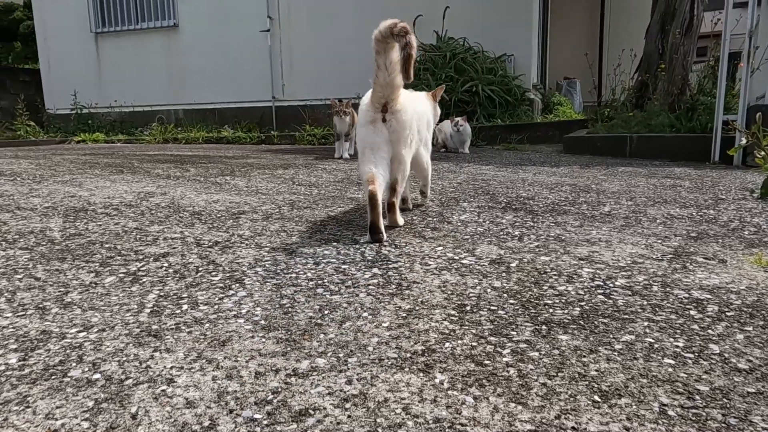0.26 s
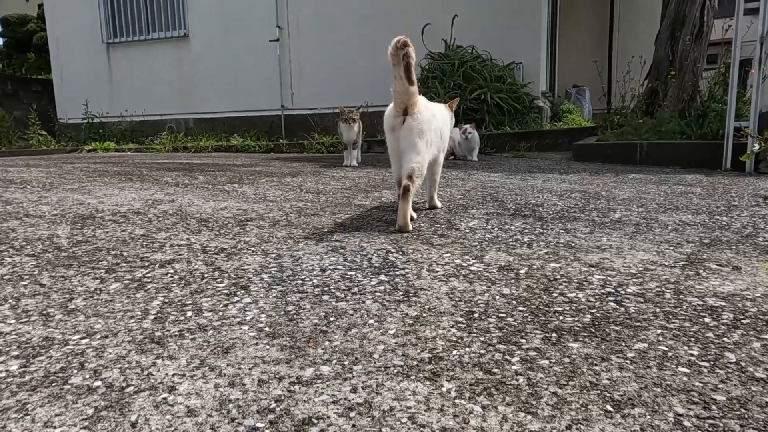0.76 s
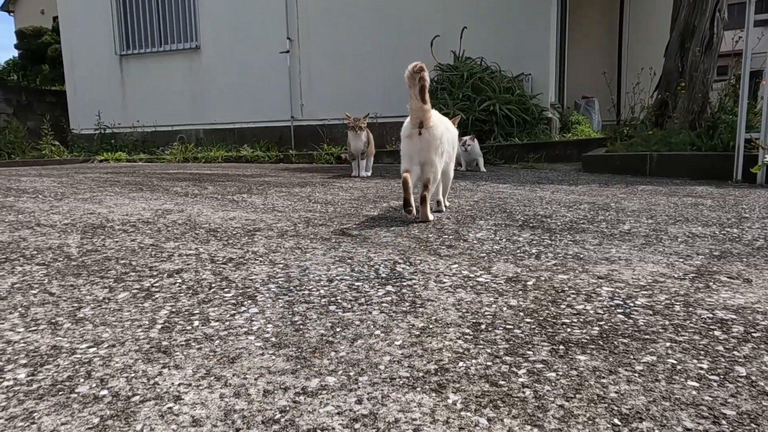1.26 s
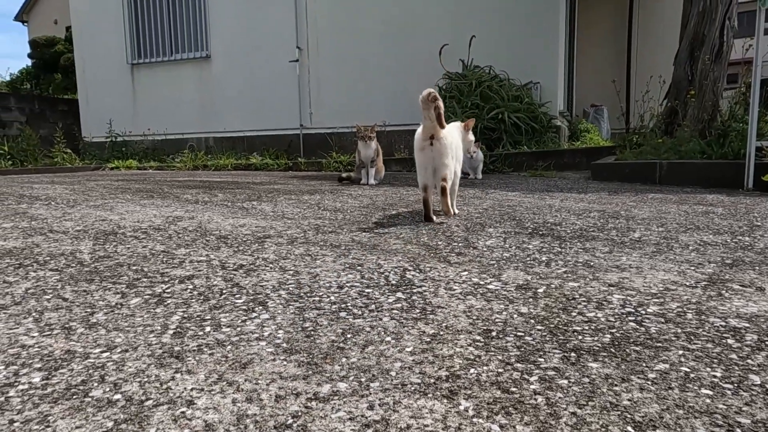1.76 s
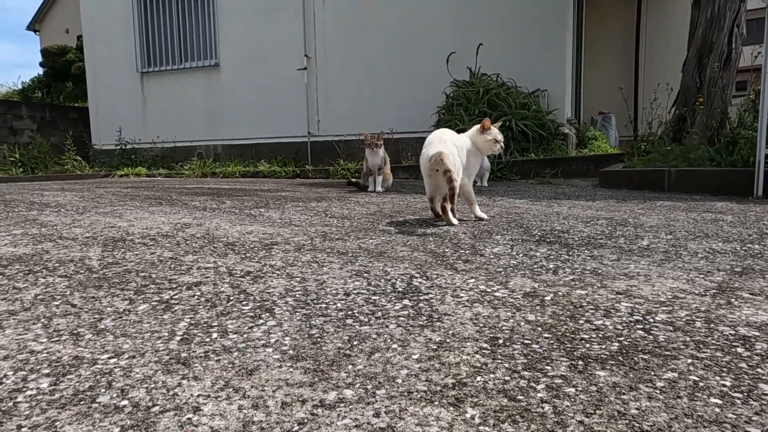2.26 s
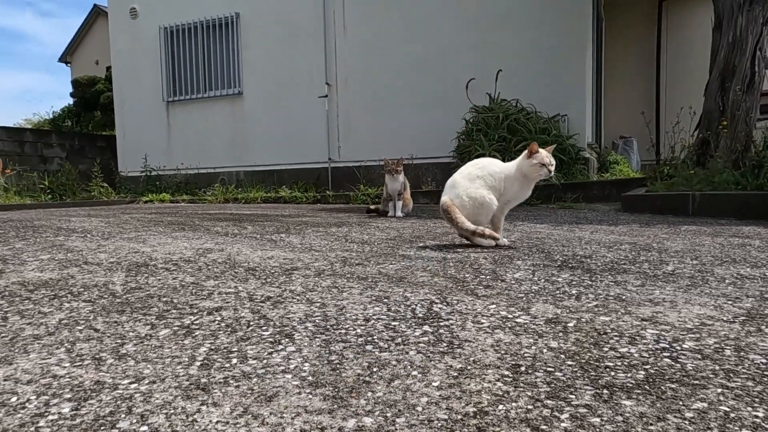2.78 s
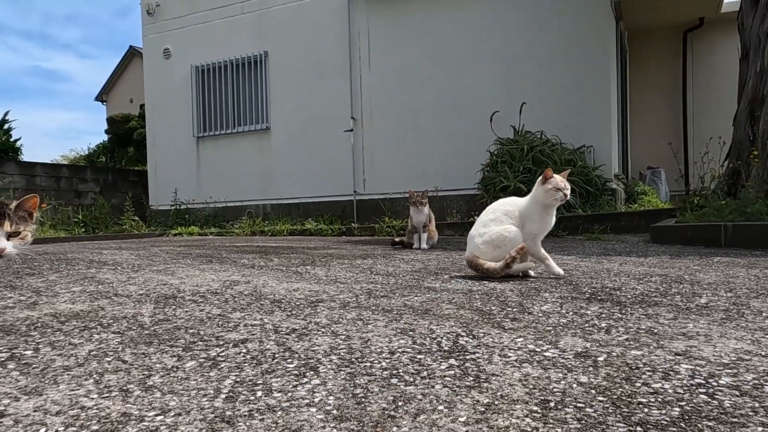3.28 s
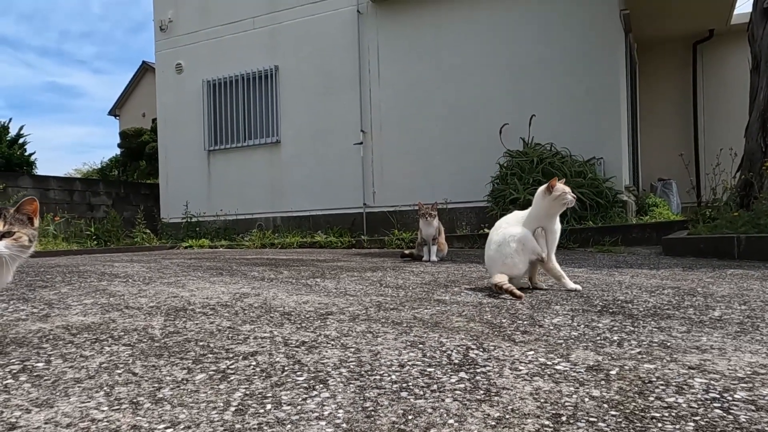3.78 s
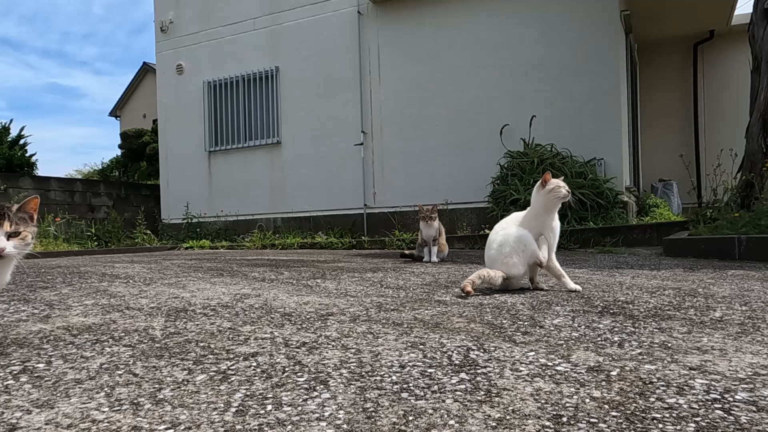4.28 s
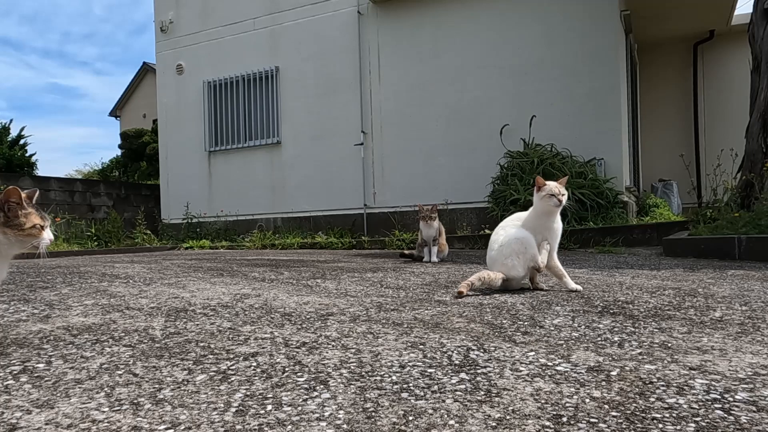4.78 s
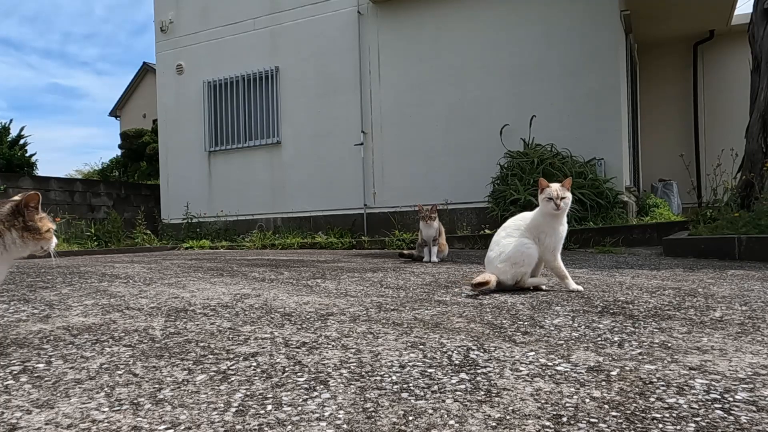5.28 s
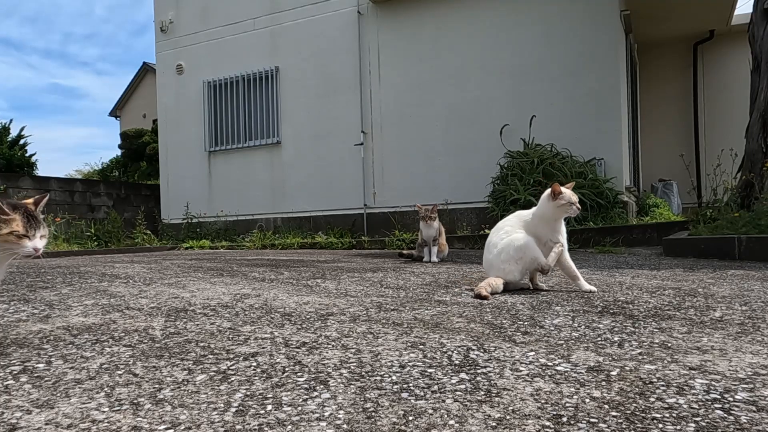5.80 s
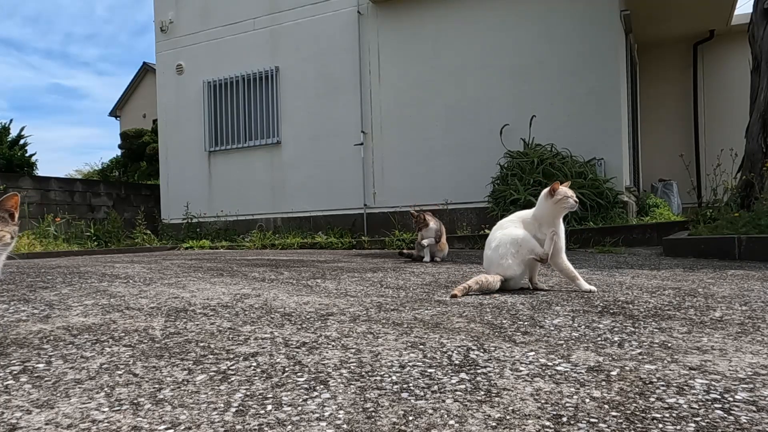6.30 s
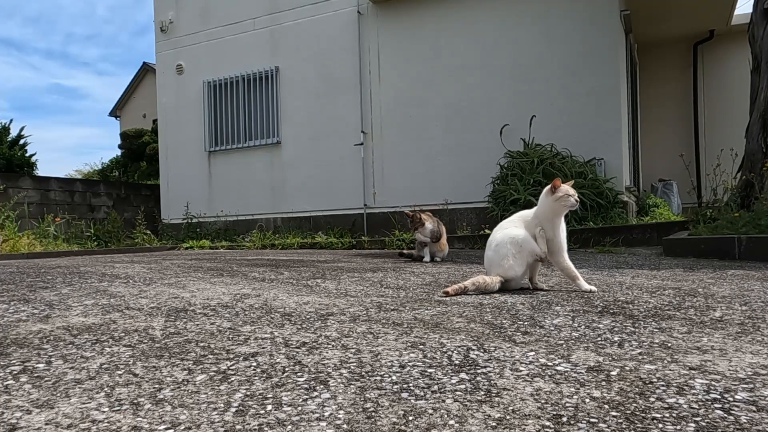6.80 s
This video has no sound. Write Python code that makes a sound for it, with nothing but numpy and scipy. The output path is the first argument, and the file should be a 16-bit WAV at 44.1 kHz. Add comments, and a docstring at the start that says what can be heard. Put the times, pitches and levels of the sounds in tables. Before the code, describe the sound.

A faint, steady yard hush lies under soft, close rustling of a cat's fur and feet, which comes and goes throughout. From about 0.6 to 2.6 seconds, paws bump lightly and grit ticks on concrete, ending in a sharper click with a low microphone jolt. At 3.4 seconds a thin metal dish on the left is nudged and clatters, the loudest moment, knocking, skidding and rocking with short, bright rings. Another rattle comes near 4 seconds with a faint swish of the sliding rim, followed by a few lighter taps until 5 seconds. From 5.3 to 6.4 seconds the dish knocks and scrapes again in quick, uneven clusters, with a brief high squeak near 5.9. It settles, leaving a soft paw step around 6.8 seconds and a last rustle. Nearby walls add a slight, short echo.

```python
"""Fur and feet rustle and scuff close by, over the faint hush of a yard. Grit ticks, paws bump
softly and a few jolts of the microphone give low pushes. Then a thin metal dish on the left is
nudged again and again: it knocks, skids and rocks on the rough ground, each touch making the
metal ring, and its sliding rim swishes and squeaks. The walls add a short echo."""
import sys
import numpy as np
from scipy import signal
from scipy.io import wavfile
from scipy.ndimage import uniform_filter1d

SR = 44100
rng = np.random.default_rng(int(sys.argv[2]) if len(sys.argv) > 2 else 0)


def dump_mix(stems):
    """Bounce the given channels to the path in sys.argv[1] as a 16-bit WAV at rate SR."""
    frames = np.atleast_2d(stems).T  # one column per channel
    limited = np.clip(frames, -1, 1)  # hard clip at full scale
    pcm = np.round(limited * 32767).astype(np.int16)
    wavfile.write(sys.argv[1], SR, pcm)


N = 310816


def gain_of(db):
    """Turns decibels into a number to multiply by."""
    return 10 ** (np.asarray(db) / 20)


def unit_level(x):
    """Scales a signal to an average power of 1."""
    return x / np.sqrt(np.mean(abs(x) ** 2) + 1e-20)


def look_up(points, hz):
    """Reads between the rows of a table, on a log frequency scale."""
    f, value = np.transpose(points)
    return np.interp(np.log(hz + 1), np.log(f + 1), value)


def sides(pan_db):
    """Left and right gains; a pan above zero is louder on the left."""
    return gain_of([pan_db / 2, -pan_db / 2])


def swell_db(t, start, hold, rise_db_per_s, fall_db_per_s):
    """A level that climbs to 0 dB at the start time, holds, then falls."""
    return -rise_db_per_s * np.maximum(start - t, 0) - fall_db_per_s * np.maximum(t - start - hold, 0)


def noise(colour, likeness, patchy_db, flicker_db, size):
    """Stereo noise with a given tone colour, uneven patches and a flickering level."""
    hop = size // 4
    frames, hz = N // hop + 5, np.fft.rfftfreq(size, 1 / SR)
    a, b, c, d, patches = rng.standard_normal((frames, len(hz), 5)).T
    patches = uniform_filter1d(patches, size=size // 64, axis=0)
    patches = unit_level(uniform_filter1d(patches, size=12, axis=1))
    flicker = unit_level(uniform_filter1d(rng.standard_normal(frames), size=3))
    alike = np.clip(look_up(likeness, hz), -1, 1)[:, None]
    left = a + 1j * b
    spectra = np.array([left, alike * left + np.sqrt(1 - alike ** 2) * (c + 1j * d)])
    spectra *= gain_of(colour(hz)[..., None] + patchy_db * patches + flicker_db * flicker)
    return unit_level(signal.istft(spectra, nperseg=size, noverlap=size - hop)[1][:, :N])


def ring(drive, hz, t60, rise=0.00016):
    """Each push starts a tone that swells, then fades by 60 dB in t60 seconds."""
    turn = np.exp(2j * np.pi * np.cumsum(hz * np.ones(drive.shape[-1])) / SR)
    swell, decay = np.exp(-1 / (rise * SR)), np.exp(-np.log(1000) / t60 / SR)
    return (turn * signal.lfilter([1 - swell], np.poly([swell, decay]), drive * turn.conj())).imag


def thin(x, low_hz, high_hz):
    """Small things give off little bass, and their blows little of the highest treble."""
    no_bass = signal.sosfilt(signal.butter(3, low_hz, "high", fs=SR, output="sos"), x)
    return signal.sosfilt(signal.butter(2, high_hz, fs=SR, output="sos"), no_bass)


# tone colours of the rustle's body and hiss: f/Hz, relative level/dB
BODY_COLOUR = [(35, -62), (60, -46), (336, -9), (373, -11.5), (407, -10.5), (610, -7.5), (930, -3.5),
               (1130, 0.5), (4000, -21.5), (5200, -22), (8800, -120)]
HISS_COLOUR = [(1180, -35), (2000, -1), (2380, -8.5), (3660, -8), (4090, -11), (4820, -8), (7610, -12.5),
               (13100, -25.5), (15700, -38)]
# how alike left and right are for close noises: f/Hz, likeness (1 = the same)
CLOSE_LIKENESS = [(60, 0.6), (240, 1), (950, 0.79), (3770, .6), (15000, 0.3)]
# fur strokes and foot scuffs: peak t/s, rise/s, hold/s, body/dB, hiss/dB, pan/dB
STROKES = [(0, .03, 0.11, -58.5, -63.5, 0), (0.499, 0.25, 0.058, -56.5, -62, -1),
           (0.893, 0.033, 0.016, -51, -60, 0.5), (1.091, 0.044, 0.097, -47, -52, 2),
           (1.266, .03, 0.037, -59, -58, 7), (1.432, 0.12, 0.051, -50.5, -52.5, 1),
           (1.619, 0.055, 0.01, -42.5, -48, 7), (1.762, 0.14, 0.037, -51, -57.5, -4),
           (1.897, 0.18, 0.066, -54, -56.5, 1.5), (2.056, 0.035, 0.033, -50.5, -63, 1.5),
           (2.128, 0.19, 0.08, -52.5, -58.5, 1), (2.342, 0.016, 0.013, -60.5, -89, -4),
           (2.492, 0.0069, 0.01, -50.5, -56, 3.5), (2.572, .03, 0.012, -57.5, -68, 0),
           (2.873, .2, 0.033, -68, -64.5, 15), (3.098, 0.092, 0.015, -52, -69, 2),
           (3.354, 0.25, 0.4, -57.5, -60.5, 1.5), (4.342, 0.24, .08, -56, -62, 6.5),
           (4.478, .05, 0.037, -56, -60.5, 3.5), (4.67, 0.077, 0.084, -60, -77, 4.5),
           (4.913, 0.23, 0.015, -55, -57.5, 7.5), (5.272, 0.018, 0.94, -55, -63, 1),
           (6.757, 0.088, 0.05, -58.5, -65, 4), (6.918, 0.066, 0.072, -52, -57, 6)]

def rustle():
    """Fur and feet rub: a lumpy body and a finer hiss swell with each stroke."""
    t = np.arange(0, N + 64, 64) / SR
    start, rise, hold, body_db, hiss_db, pan_db = np.transpose(STROKES)[..., None]
    shape_db = swell_db(t, start, hold, 20 / rise, 20 / (0.11 + hold))  # long strokes fade slowly
    body_power, hiss_power = gain_of(shape_db + body_db) ** 2, gain_of(shape_db + hiss_db) ** 2
    stir_body, stir_hiss = gain_of([-65.5, -72]) ** 2  # faint stirring between strokes
    body_total, hiss_total = body_power.sum(0) + stir_body, hiss_power.sum(0) + stir_hiss
    pan_db = ((pan_db * body_power).sum(0) + stir_body) / body_total
    curves = np.sqrt(body_total), np.sqrt(hiss_total), pan_db
    body_gain, hiss_gain, pan_db = (np.interp(np.arange(N) / SR, t, c) for c in curves)
    body = noise(lambda hz: look_up(BODY_COLOUR, hz), CLOSE_LIKENESS, 2.5, flicker_db=1.5, size=512)
    hiss = noise(lambda hz: look_up(HISS_COLOUR, hz), CLOSE_LIKENESS, 1.0, flicker_db=1.5, size=256)
    return sides(pan_db) * (body_gain * body + hiss_gain * hiss)


# tone colour of the hush: f/Hz, relative level/dB
HUSH_COLOUR = [(12, -55), (20, -24), (113, -11), (141, -20.5), (191, -1), (226, -8), (275, -10.5),
               (568, -5), (730, -11.5), (1240, 1.5), (2110, -13), (3790, -15), (15700, -33.5)]
# how alike its two sides are: f/Hz, likeness
HUSH_LIKENESS = [(60, 0.9), (240, 0.99), (950, 0.84), (3770, 0.067), (15000, 0.063)]
# which way it leans: f/Hz, pan/dB
HUSH_PAN = [(60, 2), (240, -3), (950, 3), (3770, -3.5), (15000, 17.5)]

def hush():
    """The steady, faraway noise of the yard."""
    colour = lambda hz: look_up(HUSH_COLOUR, hz) + np.outer([.5, -.5], look_up(HUSH_PAN, hz))
    return gain_of(-62.5) * noise(colour, HUSH_LIKENESS, patchy_db=4.5, flicker_db=3.0, size=1024)


# grit ticks: t/s, mid level/dB, mid f/Hz, high level/dB, high f/Hz, relative snap/dB, mid t60/s, pan/dB
TICKS = [(0.589, -43, 915, -62, 2960, -63.5, 0.06, -11), (0.605, -32, 980, -52, 2960, -71, 0.059, -6.5),
         (0.897, -43, 980, -71, 3400, -58, .03, 3), (1.19, -34, 1018, -37.5, 3310, -65, 0.055, -8.5),
         (1.201, -41, 1020, -40, 3170, -61, 0.045, 10), (1.282, -45, 987, -36.5, 2900, -48.5, 0.12, -5),
         (1.3, -45.5, 983, -42.5, 2740, -60, 0.077, -17), (1.59, -36.5, 940, -29.5, 2930, -39, 0.042, -5.5),
         (1.606, -35, 1060, -36, 2300, -61, 0.027, 15), (1.623, -34, 990, -27, 3130, -42, 0.045, -1),
         (1.745, -44.5, 696, -67, 2820, -71, 0.065, 3), (1.783, -43, 840, -56, 3700, -53, 0.028, 13),
         (1.798, -31, 1030, -37, 3740, -59, 0.031, -5), (1.879, -28.5, 1138, -25.5, 3850, -67, 0.036, -6.5),
         (2.056, -44, 940, -63, 2770, -73, .028, 5), (2.465, -41.5, 1080, -44, 4000, -103, 0.033, -7),
         (2.488, -42.5, 916, -53, 4870, -56, 0.06, 4), (2.52, -52, 930, -43.5, 7500, -60, 0.036, 15),
         (2.533, -68, 1360, -43, 7400, -69, .027, 16), (2.581, -54, 1000, -43, 7400, -51, .02, 8),
         (2.59, -27, 940, -41, 3500, -33, 0.0071, -9.5), (2.595, -53, 1000, -44, 7400, -50, .025, 12),
         (3.082, -51, 1500, -52.5, 2540, -89, .12, 15), (3.801, -42, 1290, -40, 4240, -56, 0.043, 4),
         (4.283, -54, 1280, -52.5, 2830, -66, 0.037, 18), (6.764, -51, 790, -61, 5540, -78, 0.06, 10)]

def grit():
    """Grit ticks with a dry snap and two short rings; the high one dies sooner."""
    out, t = np.zeros((2, N)), np.arange(4000) / SR
    for s, mid_db, mid_hz, high_db, high_hz, snap_db, t60, pan_db in TICKS:
        rough = rng.standard_normal((4, len(t)))
        fade = gain_of(-60 * t / t60)
        mid = np.sin(2 * np.pi * mid_hz * t) + .5 * unit_level(ring(rough[0], mid_hz, 0.023))
        high = np.sin(2 * np.pi * high_hz * t)
        high += 0.48 * unit_level(ring(rough[1], 1.31 * high_hz, 0.0012, rise=.00003))
        snap = gain_of(snap_db + 10 - 60 * t / min(.007, 0.73 * t60)) * (rough[2:] + 0.49 * rough[2])
        rings = gain_of(mid_db) * fade * mid + gain_of(high_db) * fade ** 2.8 * high
        part = out[:, round(s * SR):][:, :len(t)]
        part += sides(pan_db)[:, None] * thin(rings + snap, low_hz=385, high_hz=9000)
    return out


# microphone jolts: t/s, relative level/dB, time scale/s, pan/dB
JOLTS = [(0.6, -48, 0.0017, -13), (2.466, -49, 0.00084, -14), (2.589, -33, 0.00055, -6),
         (3.4, -51, 0.0014, 4), (3.51, -64, .002, -2), (5.5, -56, 0.0018, 5)]

def jolts():
    """A jolt swings the microphone out and back once, making one low push."""
    out = np.zeros((2, N))
    for s, db, scale_s, pan_db in JOLTS:
        age = np.arange(0, 12, 1 / SR / scale_s)
        part = out[:, round(s * SR):][:, :len(age)]
        part += sides(pan_db)[:, None] * gain_of(db) * age * (2 - age) * np.exp(-age)
    return out


# paw steps: t/s, level/dB, f/Hz
PAW_BUMPS = [(0.604, -53, 179), (0.897, -46.5, 343), (1.2, -49, 414), (1.283, -47.5, 330),
             (1.3, -48.5, 327), (1.591, -65, 324), (1.623, -53, 320), (1.783, -47, 403),
             (2.056, -47.5, 426), (2.466, -59, 401), (2.487, -49, 334), (6.764, -47, 448)]

def paws(rise_s=0.0013, t60=0.084):
    """A soft paw meets the ground with a low tone that soon dies."""
    out, t = np.zeros((2, N)), np.arange(4000) / SR
    for s, db, hz in PAW_BUMPS:
        loudness = gain_of(db - 60 * t / t60) * (1 - np.exp(-t / rise_s))
        out[:, round(s * SR):][:, :len(t)] += loudness * np.sin(2 * np.pi * hz * t)
    return out


# nudges of the dish: t/s, relative skid/dB, relative rocking/dB, hardness/(dB per octave), boosted f/Hz
NUDGES = [(3.379, -34, -73, -6, 1220), (3.397, -25, -28.5, 1.5, 2560), (3.51, -26, -26, 3.5, 2150),
          (3.96, -35, -37, 4, 2330), (5.285, -49, -35, -0.5, 2530), (5.507, -41, -27.5, 0.5, 3660),
          (5.625, -46, -32.5, 0, 2150), (5.7, -38, -29.5, -4.5, 2180), (5.76, -40, -33.5, -9.5, 3550),
          (5.879, -24.5, -31.5, -7, 2650), (6.097, -46, -37, -3, 670), (6.241, -50, -39.5, 4, 2150),
          (6.266, -28, -37, 0, 2090), (6.29, -29.5, -40, -1.5, 2940)]
DISH_SPAN_S = 3.3, 6.8

def chatter(touches_per_s=900):
    """Lists the many tiny touches as the nudged dish skids briefly, then rocks until it settles."""
    start, end = (round(s * SR) for s in DISH_SPAN_S)
    at = start + np.flatnonzero(rng.random(end - start) < touches_per_s / SR)
    t = at / SR
    s, skid_db, rocking_db, hardness_db, hz = np.transpose(NUDGES)[..., None]
    power = gain_of(skid_db + swell_db(t, s, 0, 3000, fall_db_per_s=284)) ** 2
    power += gain_of(rocking_db + swell_db(t, s, 0, 3000, fall_db_per_s=101.5)) ** 2
    lead = power.argmax(0)  # the strongest nudge sets the tone
    since = np.maximum(t - s[lead, 0], 0)
    hardness_db = hardness_db[lead, 0] + 3 * (1 - np.exp(-since / 0.02))  # lighter touches sound harder
    uneven_db = 2.52 * np.minimum(rng.exponential(1, len(at)), 3.5)
    size_db = 10 * np.log10(power.sum(0) + 1e-30) + uneven_db - 20.5
    thud_db, scratch_db, boost_db = np.outer([-1.5, 4, 10.5], np.ones(len(at)))
    return at, size_db, hardness_db, thud_db, scratch_db, hz[lead, 0], boost_db


# dish knocks: t/s, relative blow/dB, hardness/(dB per octave), extra ring/dB, boosted f/Hz
KNOCKS = [(3.399, -13, -3, -5, 1134), (3.405, -8.5, 3, -3.5, 1190), (3.412, -2.5, -1, -13, 2580),
          (3.426, -7, 2, -5.5, 4340), (3.448, -14.5, -7, 3, 3520), (3.51, -10.5, -6.5, -0.5, 2140),
          (3.53, -6.5, -2.5, 1.5, 2150), (3.544, -10.5, 8.5, -9, 2060), (3.56, -7, 8, -11, 2536),
          (3.574, -7.5, 1.5, 0, 1550), (3.613, -14, 6.5, -6, 2560), (3.634, -23.5, 5.5, 3, 2260),
          (3.664, -32.5, 7.5, 4.5, 2600), (3.893, -23, -2.5, -5, 1264), (3.946, -34, -1.5, 11, 4950),
          (3.961, -11, 2, -10.5, 2090), (3.974, -20.5, 8.5, -13, 2090), (3.998, -10, 2.5, -10, 2340),
          (4.035, -28.5, 1, 2.5, 2230), (4.116, -23, -3.5, -2.5, 5140), (4.417, -23.5, -4, -7, 1243),
          (4.434, -20.5, 2, -6, 2330), (4.537, -28, 1, -11, 2000), (4.614, -37.5, -9, 3.5, 3540),
          (4.646, -26, -7.5, -10, 1241), (4.892, -20.5, 0, -13, 1920), (4.922, -24, -3, -6.5, 976),
          (5.21, -35.5, -10, -4, 1245), (5.277, -22, -14.5, -3, 1880), (5.285, -14, 1, -3, 1900),
          (5.291, -15.5, 5, -9.5, 2603), (5.304, -9.5, -4.5, -10.5, 958), (5.329, -16, -3, -4, 2564),
          (5.427, -33, -4, -4, 2620), (5.5, -7, -1, -0.5, 1910), (5.504, -14, 8.5, -9, 3526),
          (5.511, -16.5, 8.5, -6, 2540), (5.624, -13, -5, 0, 3650), (5.634, -18, 2.5, -3, 2540),
          (5.646, -20.5, -2.5, 5.5, 3650), (5.678, -22, -5, 6.5, 2100), (5.698, -9, -4.5, -3.5, 4600),
          (5.758, -25.5, -1, 8.5, 3570), (5.858, -11, -3, 2, 4220), (5.877, -8, -4, 0.5, 2577),
          (5.936, -26, -4.5, 2, 4100), (5.961, -27, -13, -4, 2060), (6.095, -26.5, 3, -16, 1130),
          (6.112, -27.5, -7, -0.5, 670), (6.134, -32, 3, 0, 2330), (6.161, -28, 4, -14, 1950),
          (6.241, -26, -13.5, 1.5, 2140), (6.262, -15, -11, -2, 1310), (6.271, -17.5, 0.5, 4.5, 2086),
          (6.282, -29, -23, 3, 942), (6.294, -13.5, 3.5, -5.5, 2330), (6.323, -21.5, 3, 3, 4630),
          (6.334, -23.5, -19.5, -4, 4530)]

def knocks():
    """Lists the clear blows; the spot that is hit brings out one tone of the dish."""
    s, blow_db, hardness_db, ring_db, boosted_hz = np.transpose(KNOCKS)
    size_db = blow_db - 15.5 + ring_db  # the metal takes only part of a blow
    thud_db, scratch_db, boost_db = 4 - ring_db, -6 - ring_db, np.full(len(s), 16.5)
    return np.round(s * SR), size_db, hardness_db, thud_db, scratch_db, boosted_hz, boost_db


# tones the dish rings at: f/Hz, relative level/dB, t60/s, pan/dB
DISH_TONES = [(659.6, -11.5, 0.08, 5.5), (936, -8.5, 0.095, -5), (984, -8, 0.042, 10), (1135, -5, 0.056, 8),
              (1241, -6, 0.079, 8.5), (1430, -46, 0.065, -20), (1595, -29.5, 0.089, 1),
              (1703, -17, 0.11, 18.5), (1923, -14, 0.054, 9), (2055, -13.5, 0.11, 9.5),
              (2153, -12, 0.14, 7), (2343, -20.5, 0.17, 5), (2570, -16, 0.066, -8), (2642, -12.5, 0.14, 2),
              (2942, -22.5, 0.071, 28), (3350, -28, 0.19, -11), (3476, -22.5, 0.23, 8),
              (3572, -18.5, 0.12, -9.5), (4180, -20, 0.12, -2), (4506, -18, 0.05, -11.5),
              (4700, -22.5, 0.13, 0), (4960, -26, 0.11, 6), (5120, -39, 0.27, -24), (5900, -23, 0.031, -5),
              (6700, -32, 0.059, -14), (7160, -29, 0.066, 9), (8170, -40, .015, 10)]
# tones of the dull thud on the ground: f/Hz, relative level/dB, t60/s
THUD_TONES = [(1070, -11, 0.078), (1407, -1.5, 0.023), (2430, -10, 0.0063)]
# tone colour of the scratch: f/Hz, relative level/dB
SCRATCH_COLOUR = [(120, -74), (200, -31), (655, -6.5), (1460, 8.5), (2000, -7.5), (2190, -1), (3210, -12.5),
                  (7430, -22), (12600, -34.5), (15700, -46)]

def dish():
    """Every touch rings the metal's tones by chance amounts, thuds and scratches the ground."""
    touches = np.hstack([knocks(), chatter()])
    at, size_db, hardness_db, thud_db, scratch_db, boosted_hz, boost_db = touches
    start, end = (round(s * SR) for s in DISH_SPAN_S)
    at, length = at.astype(int) - start, end - start
    tones = DISH_TONES + [(hz, db, t60, 7.) for hz, db, t60 in THUD_TONES]
    level_luck, phase_luck, sign_luck = rng.standard_normal((len(at), len(tones), 3)).T
    bends = rng.standard_normal((240, len(tones)))
    out = np.zeros((2, N))
    for k, (hz, db, t60, pan_db) in enumerate(tones):
        lift_db = boost_db * np.exp(-(np.log(hz / boosted_hz) / 0.03) ** 2)
        tone_db = db + size_db + hardness_db * np.log2(hz / 1300) + lift_db
        tone_db += 3 * level_luck[k] if k < len(DISH_TONES) else thud_db + 1.5 * level_luck[k]
        # high tones reach left and right out of step
        phase = np.outer([0, np.clip(hz / 2600, 0, 1.6)], phase_luck[k])
        direction = np.sign(sign_luck[min(k, len(DISH_TONES))])  # a thud's tones move together
        drive = np.zeros((2, length), complex)
        drive[:, at] = gain_of(tone_db) * direction * np.exp(1j * phase)
        # pressure bends the metal, so the pitch wanders
        bend = np.interp(np.linspace(0, len(bends) - 1, length), range(len(bends)), bends[:, k])
        out[:, start:end] += sides(pan_db)[:, None] * ring(drive, hz * (1 + 0.0061 * bend), t60)
    touch_power = np.zeros(N)
    touch_power[at + start] = gain_of(size_db + scratch_db + 1.18 * hardness_db) ** 2
    fade = np.exp(-1 / (0.0038 * SR))  # a scratch lasts a few milliseconds
    burst = np.sqrt(signal.lfilter([1], [1, -fade], touch_power))
    scratch = noise(lambda hz: look_up(SCRATCH_COLOUR, hz), CLOSE_LIKENESS, -1.5, -0.5, size=256)
    return thin(out + burst * sides(4.3)[:, None] * scratch, low_hz=540, high_hz=13000)


# rim slides: start t/s, end t/s, start f/Hz, end f/Hz, relative width/Hz (narrow squeaks), level/dB
SWISHES = [(3.874, 3.95, 4300, 3400, 2400, -44), (4.025, 4.22, 5500, 4880, 600, -48.5),
           (5.913, 5.987, 4085, 4174, 40, -37.5)]

def swishes():
    """The rim slides: noise rings at a gliding pitch, rises fast and dies away."""
    out = np.zeros((2, N))
    for start, end, start_hz, end_hz, width_hz, level_db in SWISHES:
        along = np.arange(0, 1, 1 / SR / (end - start))
        hz = start_hz + (end_hz - start_hz) * along ** 0.26
        rub = unit_level(ring(rng.standard_normal((2, len(along))), hz, t60=5.1 / width_hz))
        part = out[:, round(start * SR):][:, :len(along)]
        part += gain_of(level_db - 20 * along) * np.minimum(along / 0.071, 1) * rub
    return out


def wall_echo(x, t60=0.14):
    """The walls send back scattered copies that blur into a short, thin tail."""
    echoes = np.zeros((2, 12000))
    at = np.arange(300, 11980, 20) + rng.integers(0, 20, (2, 584))
    np.put_along_axis(echoes, at, rng.choice([-1., 1.], at.shape), 1)
    echoes *= gain_of(-60 * np.arange(12000) / SR / t60)
    return signal.oaconvolve(x, echoes / np.linalg.norm(echoes[0]), axes=1)[:, :N]


def scene():
    """Mixes the near sounds and their echo with the jolts, rustle and hush."""
    near = dish() + swishes() + grit() + paws()
    return near + gain_of(-20.5) * wall_echo(near) + jolts() + rustle() + hush()


def record(dry):
    """The treble is slightly dulled above 13900 Hz, and all above 15750 Hz is cut."""
    top = signal.oaconvolve(dry, signal.firwin(127, 13900, pass_zero=False, fs=SR)[None], "same")
    dulled = dry - (1 - gain_of(-5)) * top
    return signal.oaconvolve(dulled, signal.firwin(511, 15750, window=("kaiser", 9), fs=SR)[None], "same")


dry = scene()
out = record(dry)
dump_mix(out)
```